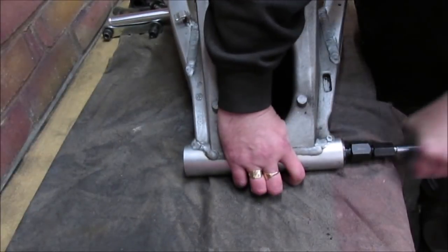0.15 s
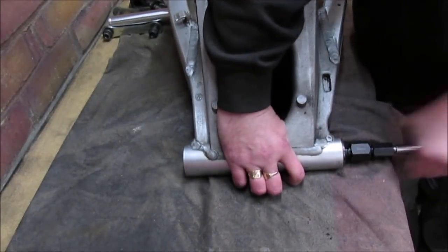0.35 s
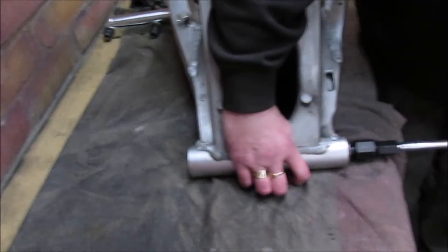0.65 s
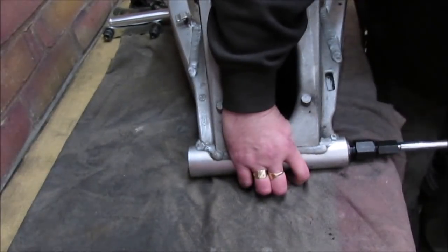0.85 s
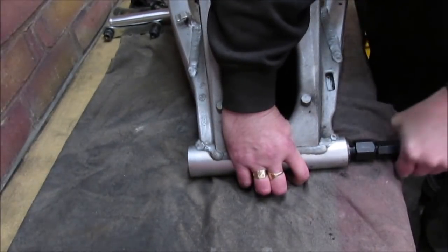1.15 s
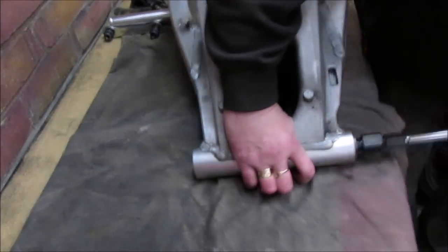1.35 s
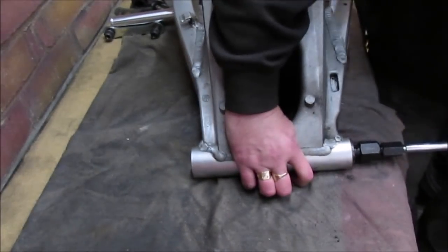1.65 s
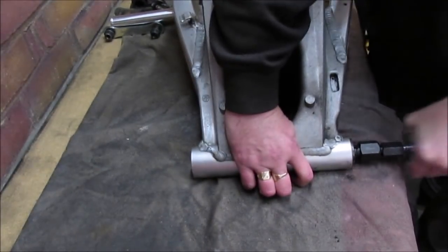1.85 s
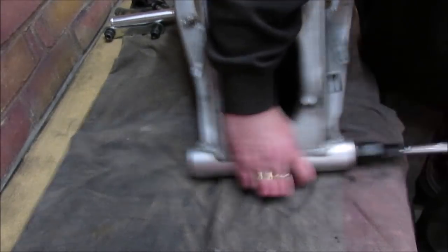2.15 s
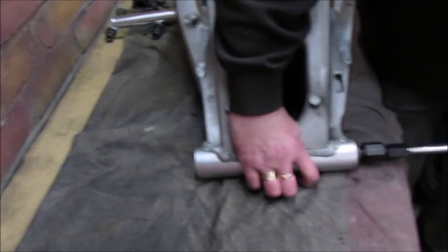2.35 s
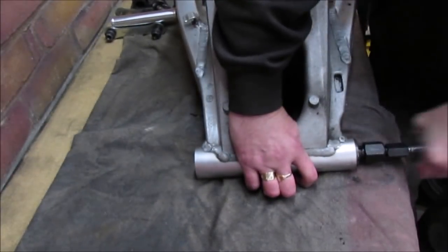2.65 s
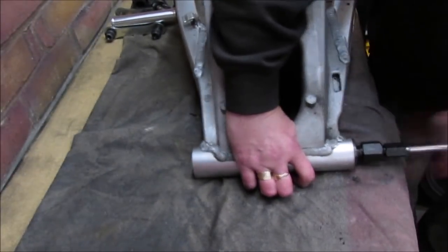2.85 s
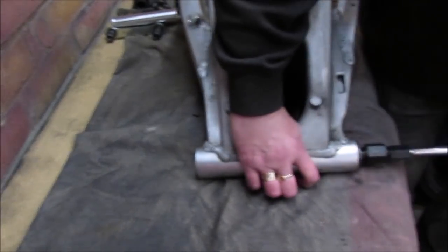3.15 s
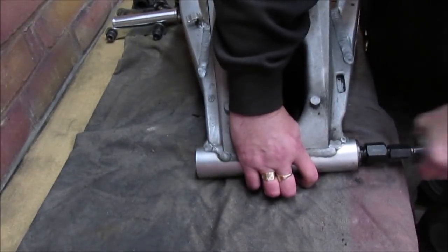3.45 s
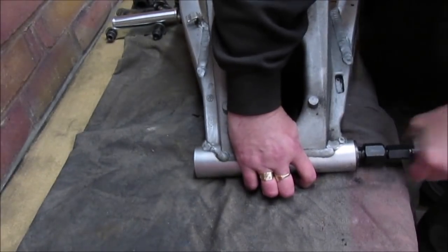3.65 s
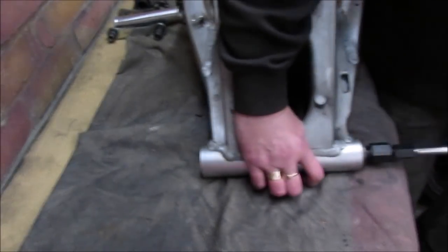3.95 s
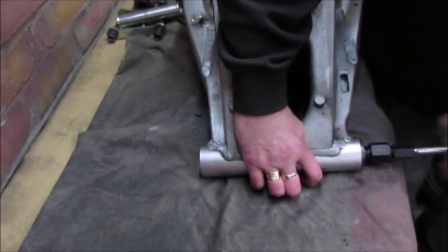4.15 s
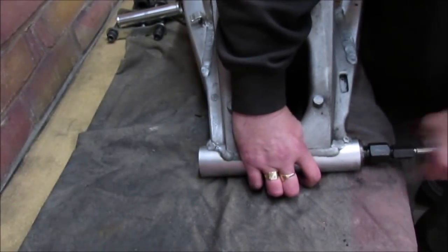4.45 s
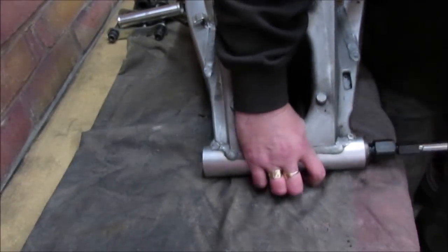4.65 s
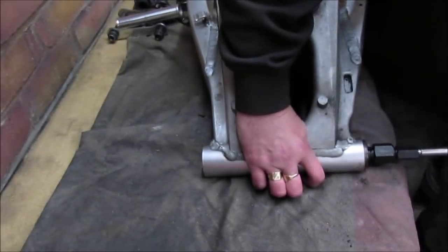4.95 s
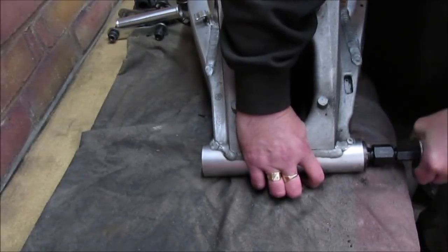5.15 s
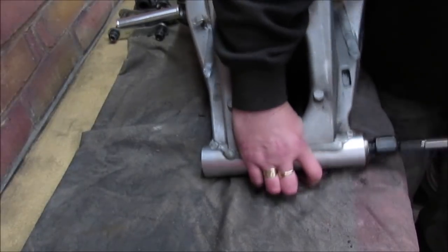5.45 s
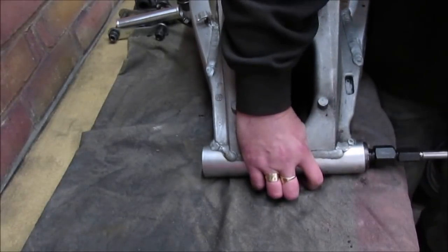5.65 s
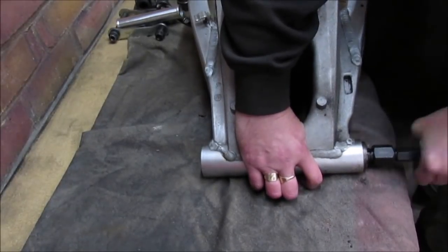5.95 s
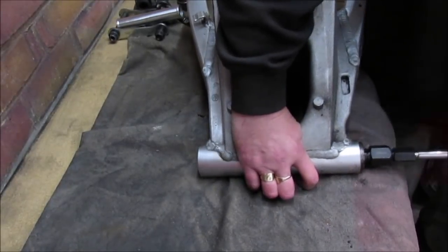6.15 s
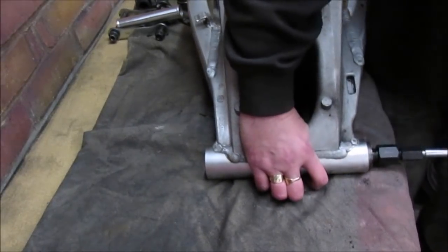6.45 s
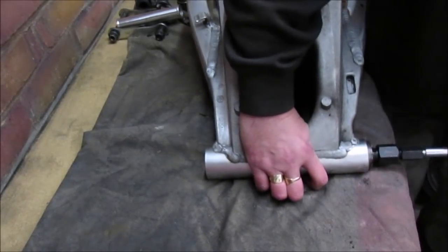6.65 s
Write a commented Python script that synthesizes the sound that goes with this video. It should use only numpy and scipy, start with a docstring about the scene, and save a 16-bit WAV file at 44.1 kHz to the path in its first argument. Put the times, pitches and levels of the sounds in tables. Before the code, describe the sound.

Close, bright metal clanks repeat about every eight tenths of a second, each preceded by a softer knock and a gritty sliding scrape.

```python
"""Slide hammer on a bearing, close by

A slide hammer draws a bearing from an aluminium arm held down on a bench in a small workshop.
The steel weight knocks against the puller, scrapes back along the rod and slams into the end stop: each
blow rings the modes of the rig over a dying hiss. Between blows the weight slides and rattles on the rod,
the bench booms low and the arm drops back with dull thumps, over the low rumble of the room.
A close microphone pair hears it in stereo."""
import sys
import numpy as np
from scipy import signal
from scipy.io import wavfile
from scipy.ndimage import uniform_filter1d

SR = 44100
rng = np.random.default_rng(int(sys.argv[2]) if len(sys.argv) > 2 else 0)


def ratio(d):
    """dB to gain"""
    e = np.asarray(d, float) / 20
    return 10 ** e


def int16_out(signal):
    """Quantize to a 16-bit WAV file."""
    q = np.round(np.clip(np.atleast_2d(signal).T, -1, 1) * 32767)
    wavfile.write(sys.argv[1], SR, q.astype(np.int16))


N = 300762  # length in samples

# Modes of arm, rod and bench:
# f/Hz, level/dB when slammed at the stop, level/dB when knocked at the puller, t60/s before scaling per blow
RIG_MODES = [(143, -21, -25, 0.35), (318, 0, -6, 0.16), (425, -16, -16, 0.2), (723, -12, -16, 0.18),
             (904, -14, -12, 0.16), (1096, -12, -14, 0.19), (1252, -8, -10, 0.18), (1281, -4, -9, 0.16),
             (1340, -11, -12, 0.23), (1437, -14, -3, 0.15), (1515, -13, -7, 0.17), (1593, -13, -9, 0.18),
             (1669, -10, 0, 0.18), (1696, -9, -3, 0.18), (1857, -11, -1, 0.16), (1976, -16, -8, 0.16),
             (2248, -15, -13, 0.25), (2296, -14, -14, 0.18), (2638, -13, -6, 0.14), (2926, -16, -14, 0.21),
             (3078, -11, -3, 0.13), (3172, -25, -9, 0.23), (3219, -15, -8, 0.16), (3472, -18, -15, 0.27),
             (3880, -16, -13, 0.16), (4187, -12, -15, 0.15), (4385, -13, -11, 0.14), (4743, -19, -21, 0.17),
             (4940, -23, -20, 0.18), (5798, -20, -19, 0.17)]
# The countless weaker modes, heard as a dying hiss, at the stop and at the puller: f/Hz, relative level/dB per Hz
STOP_HISS = [(18, -48), (30, -26), (150, -9), (400, -4), (650, -17), (1250, -2), (2480, -14), (3870, -13),
             (6000, -17), (10500, -16.5), (16000, -28.5)]
PULLER_HISS = [(18, -39.5), (30, -30), (336, -13), (600, -22.5), (1700, -1.5), (2200, -13.5), (3140, -8),
               (4650, -14), (9220, -21.5), (14000, -33.5), (16000, -43.5)]
# How long that hiss takes to die: f/Hz, t60/s before scaling per blow
HISS_DECAY = [(60, 0.043), (250, 0.23), (1000, 0.17), (3000, 0.21), (7000, 0.18), (14000, 0.15)]
# Slams at the end stop: t/s, nominal peak level/dB, gain below 500 Hz/dB, bench boom level/dB, favoured f/Hz
SLAMS = [(0.462, -4, -4.5, -53.5, 1340), (1.3272, -5.5, -2.7, -53.5, 1252),
         (2.1615, -4.5, -1.8, -54.5, 1281), (2.9547, -4, -4, -50.5, 3472), (3.801, -5, -2.5, -49.5, 2926),
         (4.583, -3.5, -3, -53.5, 2248), (5.387, -4.5, -2.5, -51, 2248), (6.244, -6, -3.5, -50.5, 1252)]
# Knocks at the puller: t/s, nominal peak level/dB, gain below 500 Hz/dB, favoured f/Hz
KNOCKS = [(0.2602, -17.5, 3.5, 1350), (0.389, -21.5, -0.5, 1898), (1.136, -10, -2.5, 1380),
          (1.9296, -14.5, -3.5, 1767), (2.7331, -10, -1.8, 1750), (3.5288, -12.5, -2.1, 1641),
          (4.2923, -9, -5, 1805), (5.1193, -8.5, -2.5, 1873), (5.9953, -7, -5, 1915),
          (6.8167, -11, 7, 1687)]
# The loose weight rattling on the rod: t/s, nominal peak level/dB, hardness as tilt/dB per octave, favoured f/Hz
RATTLES = [(0.743, -51, -6, 1243), (0.811, -51.5, 0, 1860), (0.85, -35.5, -0.1, 1740),
           (1.227, -40, -6, 1660), (1.592, -54, -6.5, 1180), (1.678, -43, 6, 1650),
           (1.742, -51, -5.5, 1680), (1.862, -54, -2, 1650), (2.449, -50, 4, 1900),
           (2.468, -42.5, -8.5, 1200), (2.693, -48, -3.5, 1660), (2.908, -40.5, 0.5, 1590),
           (3.204, -47.5, -1.5, 1870), (3.251, -48, 7, 1680), (3.274, -35.5, 5, 1560),
           (4.049, -56.5, 6.5, 1336), (4.173, -40, -1.2, 1100), (4.239, -48, -1.5, 1280),
           (4.106, -44, 4.5, 1860), (4.751, -45.5, 1.5, 1210), (4.915, -37.5, 2, 1270),
           (5.034, -36, -1, 1250), (5.347, -29, 1, 4360), (5.696, -56, -5, 1243), (5.756, -49.5, -4, 1230),
           (5.808, -38.5, -0.5, 1680), (5.84, -41, -0.5, 1250), (5.897, -40.5, -3, 3080),
           (6.123, -39.5, 7, 2030), (6.192, -41.5, -6, 1540), (6.444, -43, 1, 1230), (6.544, -48, 1, 1570),
           (6.553, -42, -4, 1534), (6.596, -34, 2, 1250), (6.696, -50.5, 2.1, 3080),
           (6.774, -46, -3.5, 1250)]
# Colour of steel rubbing on the rod, also the hiss of a rattle: f/Hz, relative level/dB per Hz
SCRAPE_SPECTRUM = [(59, -47.5), (100, -28.5), (140, -5), (289, -18), (415, -4.5), (461, -20.5), (524, -21),
                   (1280, -4), (1480, -9), (7140, -21), (16000, -53.5)]
# The arm drops back on the bench with a dull thump after a blow: t/s, nominal peak level/dB, centre f/Hz
THUMPS = [(0.63, -36, 247), (1.503, -40, 229), (2.335, -38.5, 246), (2.83, -38, 173), (3.129, -42.5, 366),
          (3.97, -43, 352), (4.754, -41, 328), (5.256, -40.5, 133)]
# Slow strokes back to the puller: start t/s, loudest t/s, start level/dB, loudest level/dB, end level/dB
PUSHES = [(0, 0.14, -59.5, -52, -62.5), (.8, 0.867, -72.5, -46.5, -58.5), (1.589, 1.75, -62, -47, -68),
          (2.452, 2.457, -50, -45, -60.5), (3.2, 3.296, -67.5, -38, -67.5),
          (4.048, 4.124, -60.5, -48, -57.5), (4.872, 4.95, -62, -47.5, -62.5),
          (5.747, 5.823, -70, -49.5, -64), (6.55, 6.612, -51, -52, -52.5)]
# Fast strokes out to the stop: start t/s, loudest t/s, start level/dB, loudest level/dB, end level/dB
PULLS = [(0.329, 0.416, -56.5, -37.5, -44), (1.209, 1.249, -39.5, -33, -43.5),
         (2.031, 2.135, -53.5, -44.5, -46.5), (2.819, 2.83, -41, -43, -42.5),
         (3.64, 3.786, -62, -42, -37.5), (4.415, 4.562, -48, -44.5, -41.5),
         (5.22, 5.359, -53, -46.5, -46.5), (6.1, 6.216, -48.5, -41, -44.5)]
# Colour of the workshop's rumble: f/Hz, relative level/dB per Hz
AIR_SPECTRUM = [(20, -5.5), (60, -15.5), (150, 1), (400, -17.5), (1500, -19.5), (5000, -42.5),
                (16000, -61.5)]
# Stereo width at the microphone pair: f/Hz, side minus mid level/dB
WIDTH = [(60, -6), (110, -24), (200, -22.5), (380, -10.5), (700, -4), (1290, -6), (2380, -5), (4400, -13.5),
         (8120, -8), (15000, 1)]

# Hardness (dB per octave) and ring (a factor on t60), nearly the same for every slam
SLAM_TILT_DB, SLAM_RING, SLAM_RING_PER_S = -0.4, 1.169, -0.002
# The same at the puller: a firm knock seats the weight and rings shorter
KNOCK_TILT_DB, KNOCK_RING, KNOCK_RING_PER_DB = -1.92, 0.79, -0.0261
RATTLE_RING = 0.9  # the hand round the weight shortens the ring
BOOM_HZ, BOOM_T60 = 62.5, 1.6  # pitch in Hz, decay in s
# Brightness (dB per octave) at start and end: a push slows, a pull gathers speed
PUSH_TILT_DB, PULL_TILT_DB = (-0.54, -1.5), (-4.5, 4.5)
SWELL, EASE = 0.76, 1.8  # powers of the rise to the loudest moment and of the fall after it
GAP_S = 0.006  # the scrape stops a few milliseconds before the blow
AIR_DB = -65.5
EDGE_HZ = 15850  # top of the recorder's band


def slams(mix):
    """The weight hits the end stop: the rig rings, the bench booms and the microphones are jolted."""
    for s, db, low_db, boom_db, loud_hz in SLAMS:
        length = SLAM_RING + SLAM_RING_PER_S * s

        def colour_db(hz):
            one_mode = favoured(hz, loud_hz) ** 30  # the power narrows it to about one mode
            return SLAM_TILT_DB * octaves(hz) + low_db * (hz < 500) + 4 * one_mode

        add(mix, s, blow(1, STOP_HISS, db, colour_db, length,
                         hiss_db=4.0, chatter=0.0077, build=0.0019, crack_db=3.5))
        add(mix, s + 0.016, boom(boom_db))
        add(mix, s, jolt(db - 22))


def knocks(mix):
    """The weight hits the puller at the other end of the rod, and the bench booms."""
    for s, db, low_db, loud_hz in KNOCKS:
        length = KNOCK_RING + KNOCK_RING_PER_DB * db

        def colour_db(hz):
            return KNOCK_TILT_DB * octaves(hz) + low_db * (hz < 500) + 5 * favoured(hz, loud_hz)

        add(mix, s, blow(2, PULLER_HISS, db, colour_db, length,
                         hiss_db=2.0, chatter=0.0052, build=0.004, crack_db=3.5))
        add(mix, s, boom(db - 49.0))


def rattles(mix):
    """Light taps of the loose weight on the rod, with little below 400 Hz."""
    for s, db, tilt_db, loud_hz in RATTLES:
        def colour_db(hz):
            return tilt_db * octaves(hz) + 7 * favoured(hz, loud_hz) - 8 * (hz < 400)

        add(mix, s, blow(2, SCRAPE_SPECTRUM, db, colour_db, RATTLE_RING,
                         hiss_db=-1.0, chatter=0.0036, build=0.0023, crack_db=2.5))


def blow(column, hiss, db, colour_db, length, hiss_db, chatter, build, crack_db):
    """Steel meets steel: clear modes over a hiss that holds while the parts chatter, then dies by band."""
    count = SR // 2
    t = np.arange(count) / SR

    def field_db(hz, s):
        # the first contact is the brightest
        crack = crack_db * np.clip(octaves(hz), 0, 3) * np.exp(-s / 0.026)
        fall = 60 * np.maximum(s - chatter, 0) / (read(HISS_DECAY, hz) * length)
        return read(hiss, hz) + colour_db(hz) + crack - fall

    modes = ring(column, colour_db, 0.86 * length, count=count, scatter_db=2.5, build=build, hold=chatter)
    dense = noise(field_db, count=count, size=256)
    dense = evened(dense) + evened(lumpy(dense, 0.008))
    head = round(0.03 * SR)  # levels are set over the first 30 ms
    both = modes / np.std(modes[:, :head]) + ratio(hiss_db) * dense / np.std(dense[:, :head])
    onset = 1 - np.exp(-t / 0.0002)
    return ratio(db - 9) * both / np.std(both[:, :head]) * onset


def ring(column, colour_db, length, count, scatter_db, build, hold):
    """The modes after one tap: each builds up, beats with a close neighbour and differs in phase left to right."""
    hz, db, t60 = (np.array(RIG_MODES)[:, k, None] for k in (0, column, -1))
    t = np.arange(count) / SR
    level, pitch, phase, beat, side, grip = rng.standard_normal((len(hz), 6, 1)).transpose(1, 0, 2)
    free = np.maximum(t - hold * np.sqrt(1500 / hz), 0)  # low modes are fed longest
    t60 = t60 * length * np.exp(0.12 * grip)  # the grip of the hand damps each mode anew
    size = ratio(db + colour_db(hz) + scatter_db * level - 60 * free / t60)
    size *= 1 - np.exp(-t * hz / (1500 * build))
    size *= 1 + 0.35 * np.tanh(hz / 1500) * np.sin(2 * np.pi * 14 * beat * t + phase)
    turn = 2 * np.pi * hz * (1 + 0.002 * pitch) * t + 3 * phase
    apart = np.arctan(ratio(read(WIDTH, hz))) * np.sign(side)
    return np.array([(size * np.sin(turn + way * apart)).sum(0) for way in (1, -1)])


def lumpy(x, spread):
    """Quick reflections inside the metal cut narrow peaks and holes into a hiss."""
    t = np.arange(3072) / SR
    reflections = rng.standard_normal(len(t)) * np.exp(-t / spread)
    return signal.fftconvolve(x, reflections[None])[:, :x.shape[1]]


def favoured(hz, loud_hz):
    """Where the weight lands favours the modes near one pitch: 1 there, 0 far away."""
    return np.exp(-(np.log2((hz + 1) / loud_hz) / 0.13) ** 2)


def jolt(db):
    """The shock rocks the microphone pair, pushing left and right in opposite senses."""
    t = np.arange(0, 0.06, 1 / SR)
    return ratio(db) * np.sin(2 * np.pi * 90 * t) * np.exp(-t / 0.005) * np.array([[-0.6], [1]])


def boom(db):
    """The bench sways unevenly at one low pitch after a blow, fading out within 0.36 s."""
    t = np.arange(0, 0.36, 1 / SR)
    waver = 1 + 0.25 * evened(uniform_filter1d(rng.standard_normal(len(t)), size=2500))
    sway = waver * np.sin(2 * np.pi * (BOOM_HZ * t + rng.random())) * ratio(db - 60 * t / BOOM_T60)
    return np.tile(sway * signal.windows.tukey(len(t), 0.5), (2, 1))


def strokes(mix):
    """The weight slides along the rod: slow pushes to the puller, fast pulls to the stop."""
    for row in PUSHES:
        add(mix, *slide(*stroke(row, KNOCKS, PUSH_TILT_DB)))
    for row in PULLS:
        add(mix, *slide(*stroke(row, SLAMS, PULL_TILT_DB)))


def stroke(row, blows, tilt_db):
    """Times, scrape level and brightness of one stroke, which lasts until just before the next blow."""
    start, top, start_db, top_db, end_db = row
    end = min(b[0] for b in blows if b[0] > top) - GAP_S
    s = np.linspace(start, end, 40)
    rise = np.clip((s - start) / (top - start), 0, 1)
    left = np.clip((end - s) / (end - top), 0, 1)
    db = start_db + (top_db - start_db) * rise ** SWELL + (end_db - top_db) * (1 - left ** EASE)
    return s, db, np.interp(s, (start, end), tilt_db)


def slide(s, db, tilt_db):
    """The bore catches on the rod in tiny ticks that keep the modes sounding, over a patchy, gritty scrape."""
    count = round((s[-1] - s[0]) * SR)
    t = s[0] + np.arange(count) / SR

    def quiet_arm(hz):  # light contact hardly bends the arm
        return -13 * (abs(hz - 318) < 50) + 5 * (hz < 200) - 0.69 * octaves(hz)

    ticks = (rng.random(count) < 300 / SR) * rng.standard_normal(count)  # about 300 per second
    rod = ring(2, quiet_arm, 0.9, count=8192, scatter_db=5.5, build=0.001, hold=0)
    modes = signal.fftconvolve(rod, ticks[None])[:, :count]

    def field_db(hz, u):
        patches = uniform_filter1d(rng.standard_normal((len(hz), len(u))), 4, 0)
        patches = uniform_filter1d(patches, 12, 1)
        bright = np.interp(s[0] + u, s, tilt_db) * np.maximum(octaves(hz), -1)
        return read(SCRAPE_SPECTRUM, hz) + bright + 3 * evened(patches)

    grit = ratio(1.6 * evened(uniform_filter1d(rng.standard_normal(count), size=300)))
    rub = noise(field_db, count=count, size=512) * grit
    both = evened(rub) + ratio(-4.0) * evened(lumpy(rub, 0.0076)) + ratio(-2.0) * evened(modes)
    level = ratio(np.interp(t, s, db)) * signal.windows.tukey(count, 200 / count)
    return s[0] + 0.003, evened(both) * level  # placed 3 ms late


def thumps(mix):
    """The arm drops back on the bench with a dull thump after a blow."""
    for s, db, centre_hz in THUMPS:
        add(mix, s, thump(db, centre_hz))


def thump(db, centre_hz):
    """A short dull puff of noise, falling 13 dB per octave either side of its centre."""
    count = SR // 8
    t = np.arange(count) / SR
    puff = noise(lambda hz, s: -13 * abs(np.log2((hz + 1) / centre_hz)) + 0 * s, count=count, size=1024)
    return ratio(db - 7) * evened(puff) * (1 - np.exp(-t / 0.0021)) * np.exp(-t / 0.029)


def air():
    """Low rumble of the workshop, nearly the same left and right, swelling slowly."""
    rumble = noise(lambda hz, t: read(AIR_SPECTRUM, hz) + 0 * t, count=N, size=2048)
    rumble = 0.3 * rumble + 0.7 * rumble.mean(0)
    swell_db = 3.5 * evened(uniform_filter1d(rng.standard_normal(N), size=6000))
    return ratio(AIR_DB + swell_db) * evened(rumble)


def noise(field_db, count, size):
    """Two-channel noise whose level in dB is a rule of frequency and time."""
    hop = size // 4
    hz = np.fft.rfftfreq(size, 1 / SR)[:, None]
    t = np.arange(count // hop + 5) * hop / SR
    a, b, c, d = rng.standard_normal((len(t), len(hz), 4)).T
    mid, side = a + 1j * b, ratio(read(WIDTH, hz)) * (c + 1j * d)
    z = np.array([mid + side, mid - side]) * ratio(field_db(hz, t))
    return signal.istft(z, nperseg=size, noverlap=size - hop)[1][:, :count]


def evened(x):
    """Scales to an rms of one."""
    return x / np.sqrt(np.mean(x ** 2) + 1e-20)


def read(points, hz):
    """Reads a spectrum table on a log-frequency axis."""
    f, value = np.transpose(points)
    return np.interp(np.log(hz + 1), np.log(f + 1), value)


def octaves(hz):
    """Distance from about 1.5 kHz in octaves; the 30 Hz offset keeps it finite at zero."""
    return np.log2((hz + 30) / 1500)


def add(mix, s, sound):
    """Mixes a two-channel sound in at s seconds."""
    part = mix[:, round(s * SR):][:, :sound.shape[1]]
    part += sound[:, :part.shape[1]]


def scene():
    """The hammer's blows, its strokes, the arm on the bench and the room."""
    mix = np.zeros((2, N))
    slams(mix)
    knocks(mix)
    rattles(mix)
    strokes(mix)
    thumps(mix)
    return mix + air()


def low_pass(x):
    """Removes everything above the highest recorded frequency."""
    return signal.sosfilt(signal.butter(12, 16680, fs=SR, output="sos"), x)


def record(dry):
    """Saturation flattens the highest peaks, then a steep low-pass limits the band."""
    edge = signal.firwin(255, EDGE_HZ, window=("kaiser", 8), fs=SR)[None]
    saturated = 0.79 * np.tanh(dry / 0.78)
    finished = signal.oaconvolve(saturated, edge, "same")
    return low_pass(finished)


dry = scene()
out = record(dry)
int16_out(out)
```